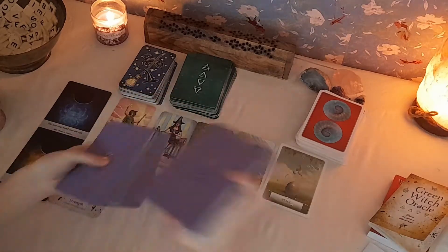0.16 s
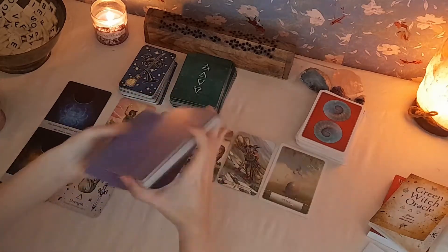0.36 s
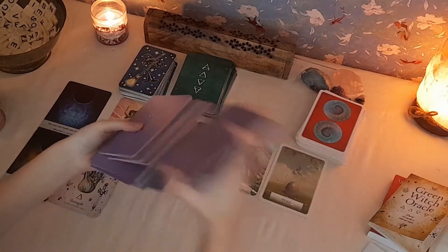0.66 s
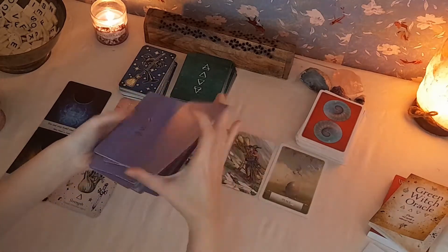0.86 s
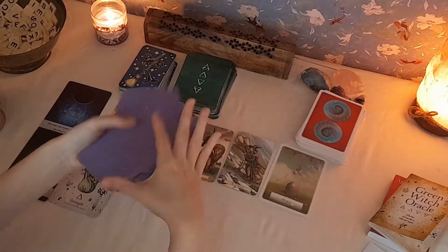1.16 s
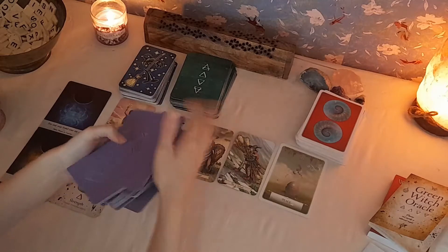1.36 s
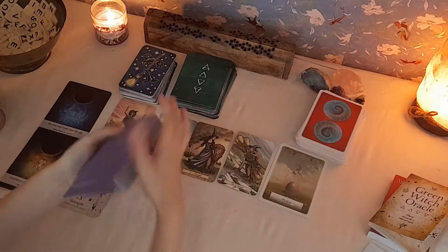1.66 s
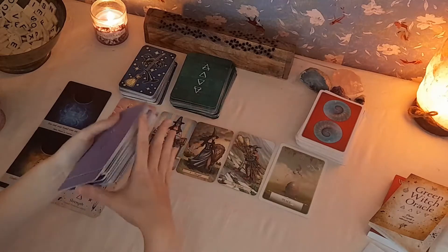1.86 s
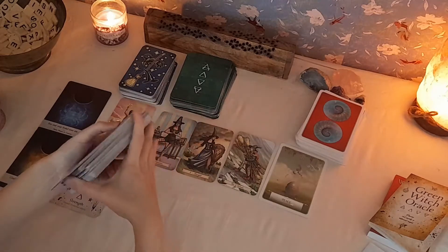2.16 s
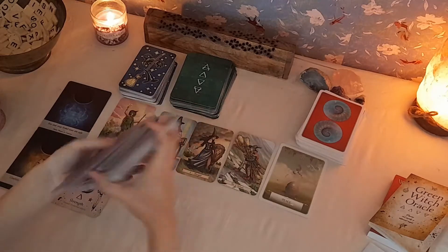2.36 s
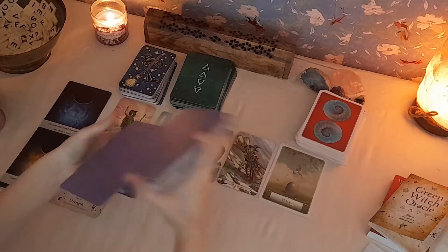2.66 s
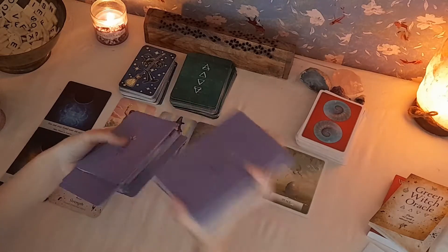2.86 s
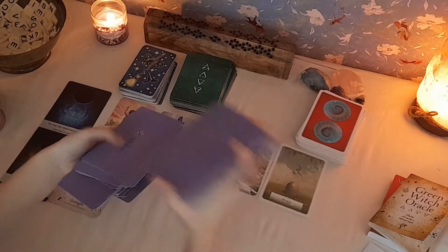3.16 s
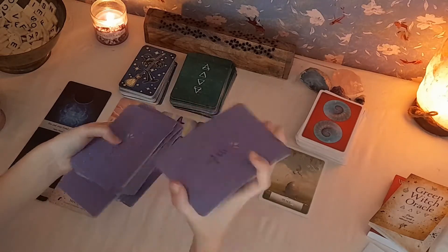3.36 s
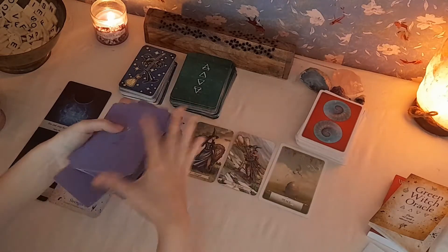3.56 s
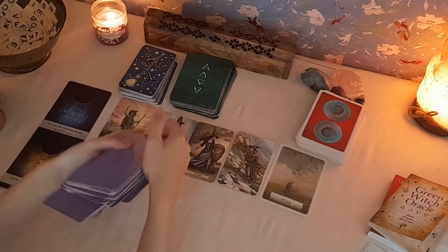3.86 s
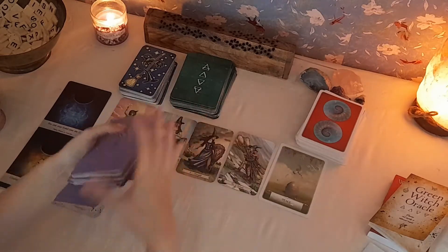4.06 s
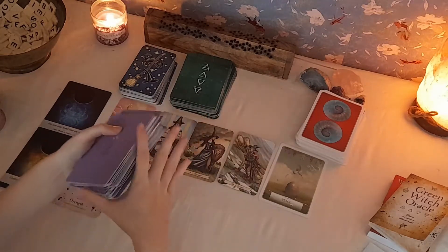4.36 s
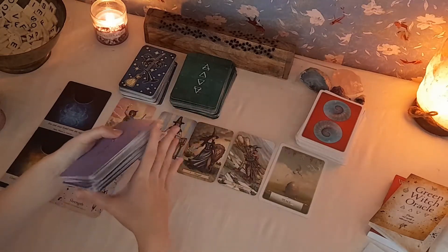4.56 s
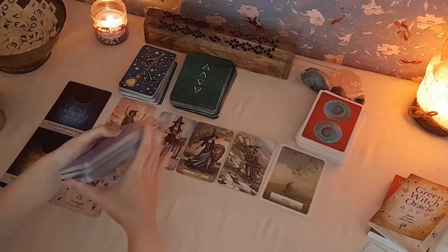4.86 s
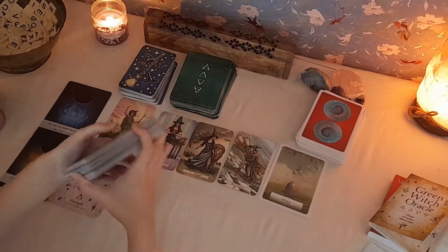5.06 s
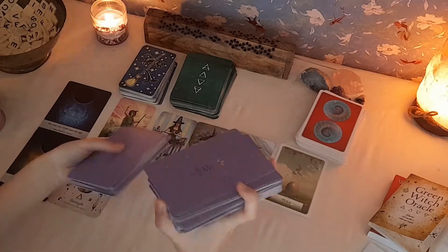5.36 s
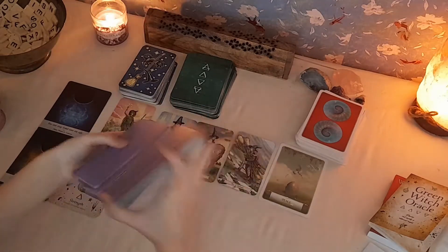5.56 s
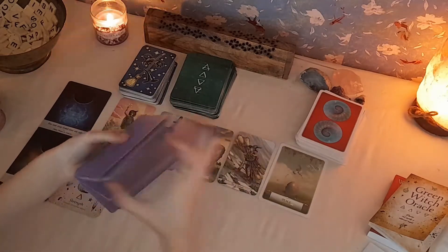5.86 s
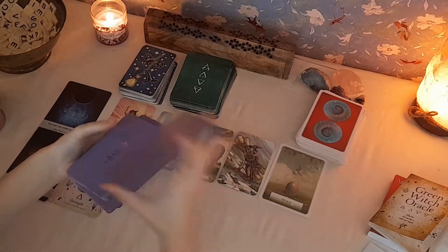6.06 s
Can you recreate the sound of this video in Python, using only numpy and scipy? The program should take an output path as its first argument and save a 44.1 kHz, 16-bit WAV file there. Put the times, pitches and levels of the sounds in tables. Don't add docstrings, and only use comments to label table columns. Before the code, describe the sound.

A deck of large, stiff cards is shuffled overhand close to the microphone. A quick run of dry claps and papery hisses comes first, then a lull of soft finger rubs, a second run with the loudest hollow slaps, another quiet squaring of the deck, and a final short run. Small room with short reflections from table and walls, faint low hum.

```python
import sys
import numpy as np
from scipy import signal
from scipy.fft import rfft, irfft
from scipy.io import wavfile
from scipy.ndimage import uniform_filter1d

SR = 44100
rng = np.random.default_rng(int(sys.argv[2]) if len(sys.argv) > 2 else 0)


def natural_amplitude(level_db):
    exponent = np.asarray(level_db, float) / 20
    return 10 ** exponent


def inscribe(sig):
    pcm = np.round(np.clip(np.atleast_2d(sig).T, -1, 1) * 32767)
    wavfile.write(sys.argv[1], SR, pcm.astype(np.int16))


N = 273861

# f/Hz, level/dB
FLOOR_SPECTRUM = [(15, -8), (40, -1), (70, -2), (95, -3.5), (150, -14), (260, -15.5), (430, -21),
                  (900, -25), (2300, -30.5), (5000, -33), (10000, -34.5), (13000, -36), (16000, -38)]
# f/Hz, rms level/dB
MAINS_HUM = [(119.7, -68.5), (240, -89.5)]
# t/s, f/Hz, level/dB
TABLE_SHAKES = [
    (.44, 35, -69),
    (.95, 35.2, -83),
    (3.56, 34.3, -69),
    (4.273, 46.8, -63),
    (5.6, 35.5, -67),
]
# f/Hz, level/dB, t60/s
TABLE_MODES = [(353.6, -50.5, 0.29), (535, -58.5, 0.48), (803, -59.5, 0.29), (1054, -65, .2),
               (1360, -62, .2), (1295, -59.5, 0.28), (1470, -66.5, .2), (1540, -64.5, .18),
               (1470, -60, 0.14), (2270, -64, .15)]
# delay/s, level/dB, favoured f/Hz
NEAR_ECHOES = [(.0020, -14.5, 1500), (.0047, -11, 1134), (.0092, -13.5, 2320), (.0103, -15, 8320),
               (0.0104, -14, 3000), (0.0123, -9, 1438), (0.0142, -12, 3110)]
# f/Hz, t60/s, energy re direct/dB
ROOM_DECAY = [(150, 0.13, -1), (400, 0.35, -9.5), (800, 0.33, -1.5), (1250, 0.38, -1), (1800, 0.29, -1),
              (2790, 0.31, -6.5), (4870, 0.34, -7), (10800, 0.092, -1), (14950, 0.15, -7)]
# f/Hz, level/dB
HISS_SPECTRUM = [(1500, -40.5), (3000, -7.5), (5000, 5.5), (7000, 10), (9000, 10.5), (11500, 5.5),
                 (13500, -1.5), (16000, -13.5)]
# f/Hz, level/dB
FLEX_SPECTRUM = [(700, -4.5), (1400, -4.5), (2100, 3.5), (2900, 2), (4200, 3.5), (5500, -3), (9000, -43)]
# f/Hz, level/dB
RUMBLE_SPECTRUM = [(80, -2), (200, 2), (450, 2), (900, -0.5), (1500, -5.5), (2600, -19.5)]
# landing t/s, hiss level/dB, lead-in per 60 dB/s
APPROACHES = [(0.408, -67, 0.5), (0.66, -59, 0.1), (.905, -61.5, 0.2), (1.13, -69, 0.4),
              (1.379, -75.5, 1.2), (2.489, -52, 0.06), (2.735, -71.5, .3), (3.01, -64, 0.23),
              (3.273, -58, 0.17), (3.99, -73.5, 0.7), (5.563, -69, 0.24), (5.867, -65, 0.2),
              (6.141, -62, 0.22)]
# t/s, hiss level/dB, t60/s, flex re hiss/dB, rumble re hiss/dB
SCUFFS = [(.174, -35.5, 0.015, -31, 3), (0.441, -42.5, 0.19, 0, -4), (.666, -49, 0.058, 0.5, 6),
          (.912, -43.5, 0.064, 0.5, -0.5), (.952, -49.5, 0.093, 5.5, 12.5), (1.166, -50, 0.17, 0, -25),
          (1.851, -74.5, 0.55, -1, -8), (1.981, -70.5, 0.11, -4, -6), (3.527, -39.5, .08, 4.5, 1),
          (3.572, -52.5, .2, -0.5, -11), (3.929, -78, 0.21, 5, -14), (4.001, -57, 0.062, -3.5, -33),
          (5.301, -53, 0.11, -3.5, -0.5), (5.652, -53.5, 0.043, -11, 9), (5.883, -40.5, 0.16, -15, -28),
          (5.949, -66, 0.18, -4, 16.5), (6.151, -47.5, 0.074, 1.5, 8.5)]
# t/s, length/s, hiss level/dB, flex re hiss/dB, rumble re hiss/dB
SLIDES = [(.149, .018, -56, -6.5, 0.5), (0.411, .025, -52.5, 0.5, -15), (0.681, 0.05, -53, 0, -7),
          (1.15, 0.0114, -58.5, 9.5, 6.5), (2.75, 0.024, -63, 4, -5), (2.771, 0.025, -50, -7, -6.5),
          (3.013, 0.013, -53.5, -3, -3.5), (3.035, 0.069, -50, -0.5, -8.5), (3.284, 0.046, -54.5, -1, 2.5),
          (1.389, 0.014, -58.5, -22, -30), (4.424, .055, -65.5, 0, -16.5), (5.569, 0.0092, -52.5, 0, -10.5),
          (5.583, 0.025, -48.5, 1, 0), (5.615, .036, -57, -1, -20), (5.876, 0.0078, -45, 5, 4.5),
          (6.175, 0.018, -51, -10, -1.5)]
# t/s, length/s, hiss level/dB, flex re hiss/dB, rumble re hiss/dB
RUBS = [(.005, 0.055, -67, -2, -24), (0.072, 0.026, -61.5, -9.5, -24), (0.12, 0.053, -63, -9, -27),
        (1.402, 0.022, -59, -3, -30), (1.441, 0.072, -63.5, -2, -23), (1.61, 0.048, -73.5, 1, -6.5),
        (2.17, 0.16, -81, 3, -6), (2.333, 0.072, -62, -9.5, -14), (2.407, 0.1, -66.5, -18, -22),
        (2.608, 0.0096, -78, 2, -3.5), (3.771, 0.0045, -59, -2.5, -14), (3.805, 0.066, -67, -1, -21),
        (4.26, 0.024, -63.5, -8, -27), (4.303, .02, -55.5, -13.5, -41), (4.36, 0.059, -74, -2, -24),
        (4.543, .005, -84.5, 0, -4.5), (4.716, .005, -78.5, -10, -11.5), (4.952, 0.013, -69, -5, -28),
        (5.0, .08, -73.5, -3, -24.5), (5.105, 0.12, -70.5, -7, -28), (5.221, 0.017, -67, -2, -18),
        (5.253, 0.044, -60.5, -6.5, -20), (5.368, 0.024, -72, -9.5, -5)]
# f/Hz, level/dB
SLAP_SPECTRUM = [(900, -16.5), (1900, -4), (2500, -0.5), (3600, -9), (4600, -6), (5600, -30.5),
                 (8000, -38.5)]
# f/Hz, level/dB
TICK_SPECTRUM = [(2500, -31), (5000, 9.5), (6500, 10), (9000, 8), (12000, -13.5), (16000, 0)]
# t/s, thud peak level/dB
PALMS = [(.169, -32), (.411, -58), (0.4399, -36), (.467, -31), (.665, -35), (.743, -32), (.911, -36),
         (.951, -29), (.981, -32), (1.16, -38.5), (2.493, -35), (2.745, -44), (2.8116, -28), (3.015, -55),
         (3.035, -40.5), (3.086, -23.5), (3.291, -42), (3.357, -29.5), (3.524, -29), (5.3, -52.5),
         (5.569, -45), (5.587, -38), (5.628, -56), (5.6515, -34.5), (5.882, -33), (5.949, -37.5),
         (6.151, -40)]
# t/s, clap peak level/dB, air pocket f/Hz, tick re clap/dB
MORE_CLAPS = [(.411, -48.5, 1633, -3), (0.445, -36, 1550, 3), (1.146, -48, 1580, 9), (1.385, -55.5, 2120, 6),
              (1.867, -64.5, 1420, -7), (2.378, -51.5, 1920, 4), (2.409, -63, 750, 8), (2.744, -48, 670, 6.5),
              (2.782, -45, 1550, -4), (3.016, -50, 740, -2), (3.293, -44, 1250, 5), (3.999, -64, 2600, 13),
              (4.235, -66.5, 2440, -5), (4.422, -58, 2200, 4), (5.038, -62, 1460, -6.5), (5.213, -55, 1500, 4),
              (5.3004, -45.5, 1800, 11.5), (5.569, -58, 844, 5), (5.874, -63, 620, -5), (5.885, -39, 1692, 7)]
# t/s, clap peak level/dB, air pocket f/Hz, tick re clap/dB, slap re clap/dB
CLAPS = [(.169, -27, 1360, -0.5, -5.5), (.4395, -37.5, 760, -5, 2), (.467, -30, 1580, 3, -4),
         (.665, -42, 553, 5, 4.5), (.743, -36, 1110, -3, -2), (.911, -32.5, 1820, -2.5, -9),
         (.951, -38.5, 890, 0, 5), (.9809, -26.5, 1180, -5.5, 1.5), (1.159, -32.5, 1660, 1.5, -10),
         (2.493, -34.5, 1350, 2.5, -1), (2.769, -36.5, 1420, -4, -5.5), (2.8116, -29.5, 1310, -0.5, -1.5),
         (3.035, -41, 1580, -12, 5.5), (3.0862, -15, 1284, -29, -1.5), (3.3573, -18, 1116, -10.5, -4.5),
         (3.5238, -22.5, 1250, 2, -3), (3.569, -32, 1930, 2.5, -13.5), (5.587, -42.5, 735, -7, 10),
         (5.630, -32, 1730, -1, -13), (5.6515, -35, 1630, 3, 1), (5.8819, -20, 1590, -19, 0.5),
         (5.8945, -29, 1616, -8, 0), (5.948, -39.5, 1090, -4, 2), (6.151, -37.5, 762, -1, 3.5)]


def unit(x):
    return x / np.sqrt(np.mean(x ** 2))


def colour(x, spectrum):
    hz, db = np.transpose(spectrum)
    size = 4096
    bins_hz = np.arange(size // 2 + 1) * SR / size
    log_gain = np.interp(np.log(bins_hz + 1), np.log(hz), db) * np.log(10) / 20
    cepstrum = irfft(log_gain)
    cepstrum[1:size // 2] *= 2
    cepstrum[size // 2 + 1:] = 0
    response = irfft(np.exp(rfft(cepstrum)))
    return signal.fftconvolve(x, response)[:len(x)]


def walk(rate_hz):
    hold = int(SR / rate_hz)
    steps = np.repeat(rng.standard_normal(N // hold + 1), hold)
    slewed = uniform_filter1d(uniform_filter1d(steps, hold), hold)
    return unit(slewed[:N])


def ring(t, hz, cycles):
    y = np.sin(2 * np.pi * hz * t) * np.exp(-t * hz / max(cycles, .2))
    return y / np.max(np.abs(y))


def floor_noise():
    noise = colour(rng.standard_normal(N), FLOOR_SPECTRUM)
    upper = signal.sosfilt(signal.butter(4, 300, "high", fs=SR, output="sos"), noise)
    level_db = -79 + 0.48 * walk(1.0)
    return noise * natural_amplitude(level_db) / np.std(upper)


def mains_hum():
    t = np.arange(N) / SR
    hum = np.zeros(N)
    for hz, db in MAINS_HUM:
        hum += np.sqrt(2) * natural_amplitude(db + .5 * walk(6)) * np.sin(2 * np.pi * hz * t)
    return hum


def table_shakes():
    t = np.arange(N) / SR
    shakes = np.zeros(N)
    for s, hz, db in TABLE_SHAKES:
        age = np.clip(t - s, 0, None)
        envelope = (age / 0.032) * np.exp(1 - age / 0.049)
        shakes += natural_amplitude(db) * np.sin(2 * np.pi * hz * age) * envelope
    return shakes


def echoes(x):
    t = np.arange(SR // 4) / SR
    response = np.zeros(len(t))
    for hz, db, t60 in TABLE_MODES:
        response += natural_amplitude(db - 60 * t / t60) * np.sin(2 * np.pi * hz * t)
    for delay, db, hz in NEAR_ECHOES:
        since = np.clip(t - delay, 0, None)
        response += natural_amplitude(db) * 4 * hz / SR * ring(since, hz, 0.91)
    return signal.fftconvolve(x, response)[:N]


def linger(energy, seconds):
    keep = np.exp(-1 / (seconds * SR))
    return signal.lfilter([1 - keep], [1, -keep], energy)


def tail(x):
    delay_s, build_up_s = .0035, 0.00034
    hz, t60, db = np.transpose(ROOM_DECAY)
    out = np.zeros(N)
    for f in 100 * 2 ** np.arange(0, 7.3, 1 / 3):
        edges_hz = [f * 2 ** (-1 / 6), f * 2 ** (1 / 6)]
        band = signal.butter(2, edges_hz, "band", fs=SR, output="sos")
        decay_s = np.interp(np.log(f), np.log(hz), t60) / (2 * np.log(1000))
        energy = signal.sosfilt(band, x) ** 2
        stored = linger(linger(energy, build_up_s), decay_s)
        diffuse = unit(signal.sosfilt(band, rng.standard_normal(N)))
        band_db = np.interp(np.log(f), np.log(hz), db)
        out += natural_amplitude(band_db) * np.sqrt(stored) * diffuse
    return np.concatenate([np.zeros(int(delay_s * SR)), out])[:N]


def room(x):
    return x + echoes(x) + tail(x)


def strokes():
    catch_s, lift_s = .01, 0.02
    rub_rise_s, rub_fall_s = 0.082, 0.1
    approach_hold_s = 0.0017
    approach_flex_db, approach_rumble_db = -8, -21.5
    rows = []
    for s, db, lead in APPROACHES:
        rows.append((s - approach_hold_s, lead, approach_hold_s, lift_s, db, approach_flex_db, approach_rumble_db))
    for s, db, t60, flex_db, rumble_db in SCUFFS:
        rows.append((s, catch_s, 0, t60, db, flex_db, rumble_db))
    for s, hold, *levels_db in SLIDES:
        rows.append((s, catch_s, hold, lift_s, *levels_db))
    for s, hold, *levels_db in RUBS:
        rows.append((s, rub_rise_s, hold, rub_fall_s, *levels_db))
    return rows


def sliding_friction():
    t = np.arange(N) / SR
    gains = np.full((3, N), 1e-9)
    for s, rise, hold, fall, hiss_db, flex_db, rumble_db in strokes():
        before, after = (s - t) / abs(rise), (t - s - hold) / abs(fall)
        away = np.maximum(np.maximum(before, after), 0)
        gains += natural_amplitude(hiss_db - 4.0 - 60 * away) * natural_amplitude([[0], [flex_db], [rumble_db]])
    firm = np.clip(gains[0] / natural_amplitude(-66), .35, 1)
    grain_size = 2.5 * np.minimum(rng.exponential(size=N), 4)
    judder = 1.8 * walk(220) + walk(50)
    grains = rng.standard_normal(N) * natural_amplitude(firm * (grain_size + judder))
    grains = grains / np.sqrt(uniform_filter1d(grains ** 2, size=2048))
    out = np.zeros(N)
    for gain, spectrum in zip(gains, (HISS_SPECTRUM, FLEX_SPECTRUM, RUMBLE_SPECTRUM)):
        out += gain * unit(colour(grains, spectrum))
    return out


def crack(t, decay_s, spectrum):
    y = colour(rng.standard_normal(len(t)) * np.exp(-t / decay_s), spectrum)
    return y / np.max(np.abs(y))


def clap(t, pocket_hz, tick_db, slap_db):
    pocket = ring(t, pocket_hz, 1.49) * np.clip(t * pocket_hz / 0.61, 0, 1)
    slap = natural_amplitude(slap_db) * crack(t, 0.0011, SLAP_SPECTRUM)
    tick = natural_amplitude(tick_db) * crack(t, 0.00046, TICK_SPECTRUM)
    return pocket + slap + tick


def landings():
    more_claps_slap_db = 3
    t = np.arange(2048) / SR
    out = np.zeros(N + len(t))
    for s, db, *parts in CLAPS + [(*more_clap, more_claps_slap_db) for more_clap in MORE_CLAPS]:
        out[int(s * SR):][:len(t)] += natural_amplitude(db) * clap(t, *parts)
    for s, db in PALMS:
        out[int(s * SR):][:len(t)] += natural_amplitude(db) * ring(t, 546, 0.43)
    return signal.sosfilt(signal.butter(1, 70, "high", fs=SR, output="sos"), out[:N])


def scene():
    background = floor_noise() + mains_hum() + table_shakes()
    cards = landings() + sliding_friction()
    return (room(cards) + background)[None]


def band_limit(x):
    return signal.sosfilt(signal.butter(12, 16470, fs=SR, output="sos"), x)


def record(dry):
    low_pass = signal.ellip(10, .2, 60, 15800, fs=SR, output="sos")
    mix = signal.sosfilt(low_pass, dry)
    return band_limit(mix)


dry = scene()
out = record(dry)
inscribe(out)
```